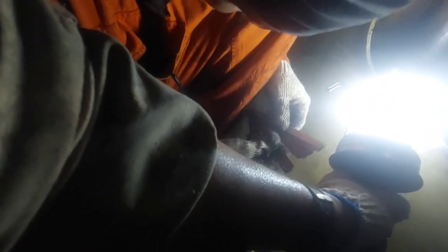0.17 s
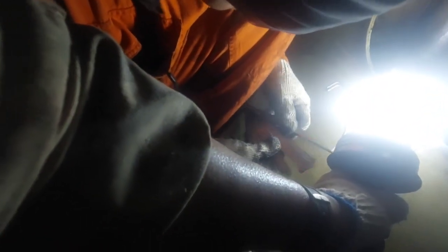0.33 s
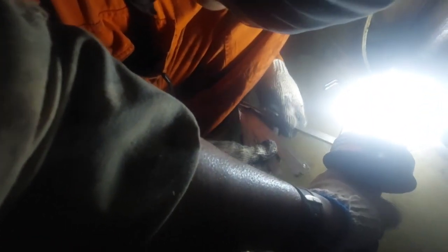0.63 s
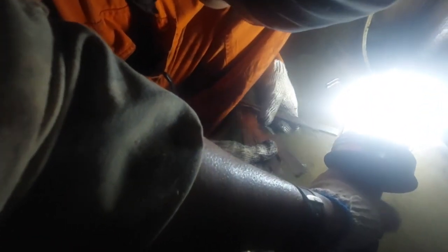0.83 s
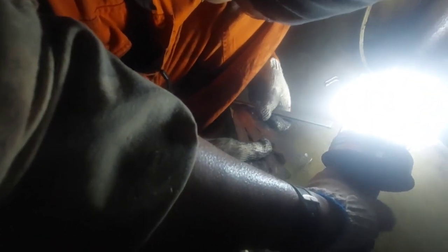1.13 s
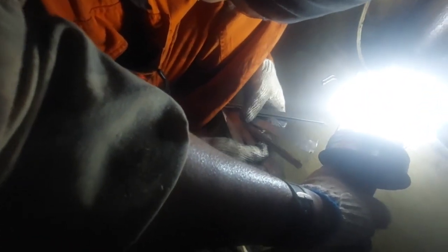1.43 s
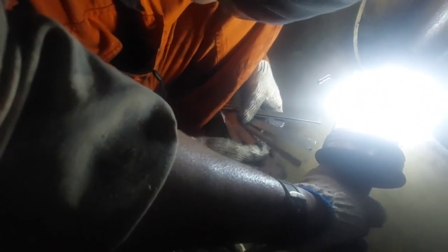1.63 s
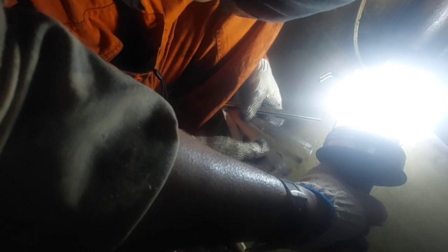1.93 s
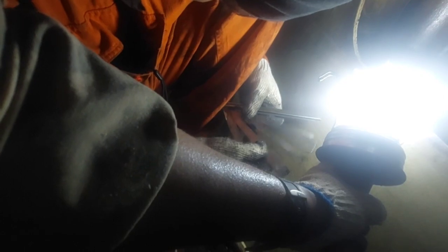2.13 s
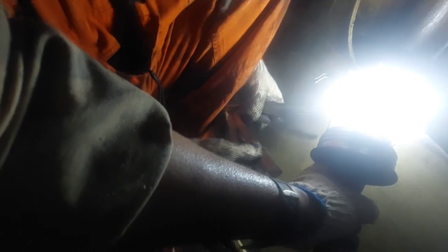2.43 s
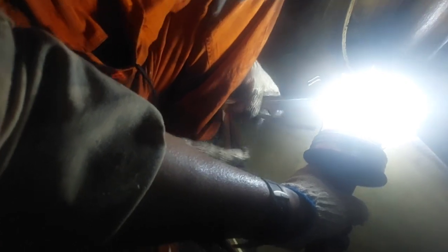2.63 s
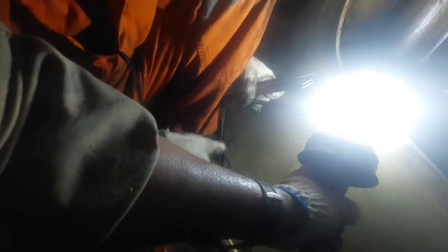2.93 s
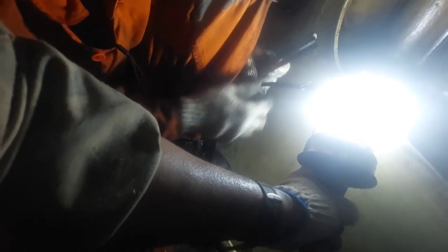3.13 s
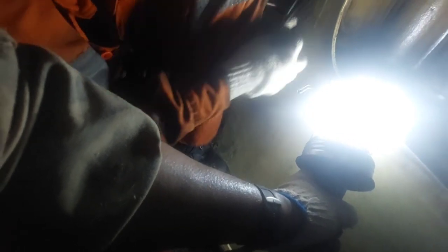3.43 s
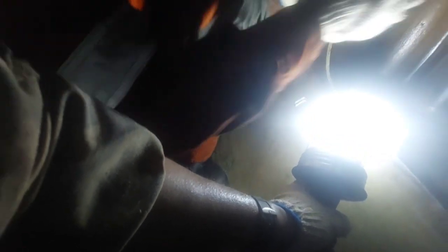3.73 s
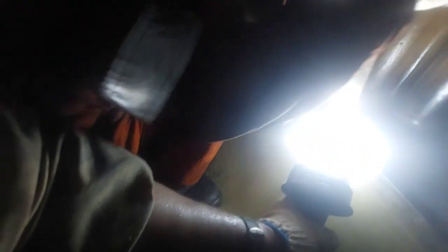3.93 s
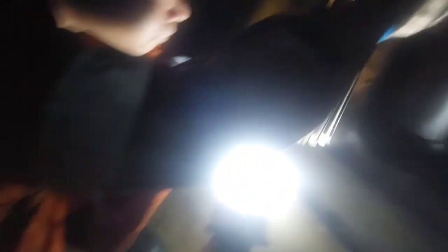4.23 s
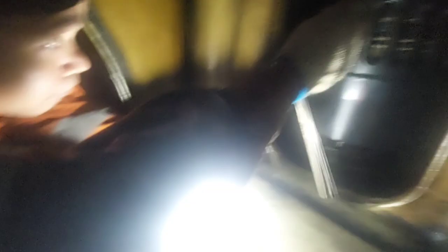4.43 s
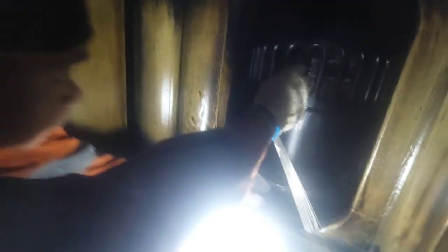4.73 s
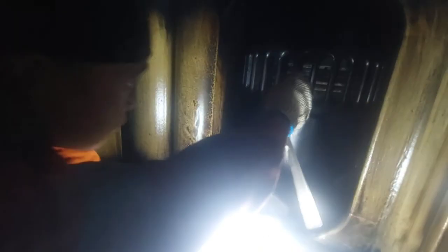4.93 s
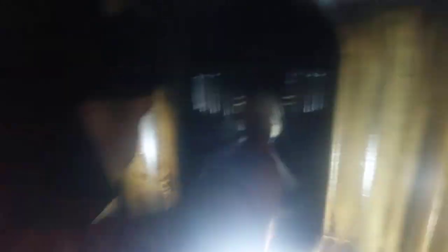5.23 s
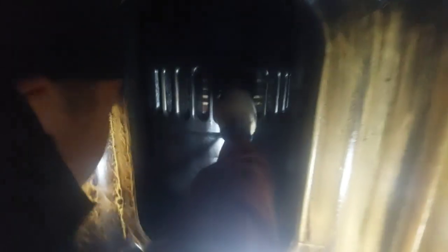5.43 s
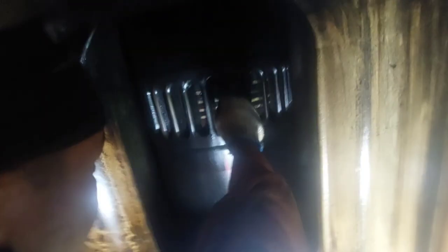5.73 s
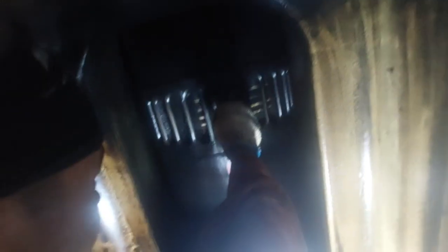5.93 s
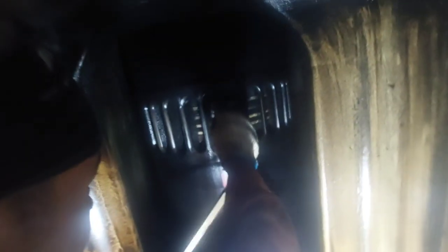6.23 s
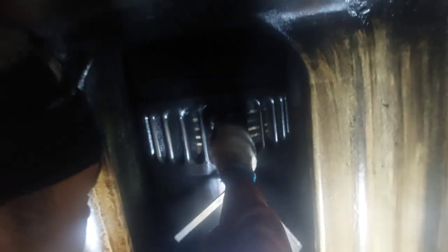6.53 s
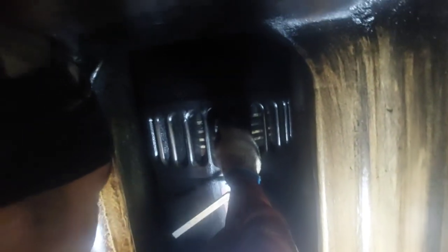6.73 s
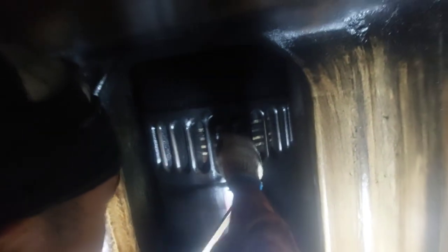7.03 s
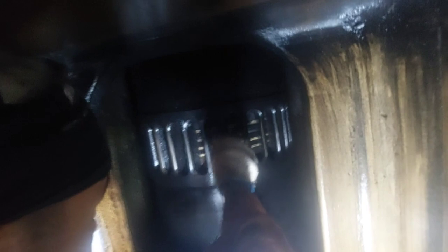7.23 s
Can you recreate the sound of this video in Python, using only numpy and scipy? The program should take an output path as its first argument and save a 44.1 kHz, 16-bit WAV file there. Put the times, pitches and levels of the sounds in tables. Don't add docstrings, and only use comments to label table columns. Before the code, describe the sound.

A heavy engine drone with air roar and pump whine fills a steel space, dipping after a knock on the camera, then a metallic click.

```python
import sys
import numpy as np
from scipy import signal
from scipy.fft import irfft
from scipy.io import wavfile
from scipy.ndimage import uniform_filter1d

SR = 44100
rng = np.random.default_rng(int(sys.argv[2]) if len(sys.argv) > 2 else 0)


def voltage_ratio(level):
    return 10 ** (np.asarray(level, float) / 20)


def generate_wav(signal):
    frames = np.transpose(np.atleast_2d(signal))
    scaled = np.clip(frames, -1, 1) * 32767
    pcm = np.round(scaled).astype(np.int16)
    wavfile.write(sys.argv[1], SR, pcm)


N = 325017

CYCLE = 5884
# t/s, share inside the casing
CASING_PATH = [
    (0, 0.0091),
    (3.9, 0.075),
    (4.5, 0.31),
    (5.0, 0.28),
    (5.5, 0.89),
    (7.37, 1),
]
# multiple of the cycle rate, level/dB outside, level/dB inside
STRONG_ORDERS = [(8, -37, -39), (12, -25, -28), (13, -24, -26), (20, -27, -38), (21, -32, -34),
                 (23, -47, -47), (24, -47, -46), (27, -25, -27), (29, -29, -31), (31, -29, -33),
                 (32, -43, -25), (33, -32, -33), (34, -29, -34), (35, -32, -34), (39, -35, -30),
                 (40, -32, -23), (41, -37, -26), (42, -42, -24), (44, -35, -23), (53, -27, -43),
                 (54, -31, -32), (55, -28, -32), (63, -33, -38), (66, -33, -45), (105, -48, -41),
                 (117, -46, -42), (126, -35, -50), (128, -48, -42), (154, -50, -41), (156, -41, -47)]
# f/Hz, level/dB outside, level/dB inside
WEAK_ORDERS = [(30, -46, -64), (81, -68, -67), (136, -55, -62), (180, -41.5, -49), (252, -31, -28),
               (309, -40, -52), (388, -36.5, -36.5), (480, -40, -37.5), (652, -49, -52.5),
               (710, -44, -59.5), (920, -46, -58.5), (1090, -55, -51), (1430, -58, -91), (2020, -62, -64)]
# order, level/dB outside, level/dB inside
TONES = [(16, -15, -15), (9, -20.5, -39), (30, -21.5, -22), (77.84, -30.5, -41), (6, -32, -33.5),
         (0, -27, -21)]
# beat f/Hz, share of the twin, t/s of a crest
BEATS = [(0.894, 0.11, 1.96), (0.88, 0.28, 1.04), (0.708, 0.22, 2.36), (0.42, 0.21, 3.68),
         (0.58, 0.14, 2.3), (0.607, 0.17, 1.2)]
# order, t/s, level/dB, half-width/s
STANDING_WAVES = [(16, 5.25, -18, 0.39), (16, 1.95, 3.5, .15), (16, 6.8, -6, .12), (16, 7.15, 3.5, 0.087),
                  (9, 0.28, 5.5, 0.14), (9, 0.49, -8, 0.074), (9, 1.87, -8, 0.11), (9, 1.32, 5.5, .35),
                  (9, 2.34, -8, 0.23), (9, 2.9, 6, .15), (9, 3.2, -8, .1), (9, 3.52, 7, .15),
                  (9, 3.83, -10, .15), (9, 7, 8, .3), (9, 4.1, 7, .1), (9, 5, -15, 0.37), (9, 2.1, 5, 0.13),
                  (30, 4.54, 6.5, 0.31), (30, 3.25, 1, 0.13), (78, 4.95, 10, 0.55), (6, 5.1, -9, 0.39),
                  (0, .1, -10, 0.26), (0, 4.93, -9.5, 0.4), (0, 5.35, 5.5, 0.14), (0, 6.4, 2.5, 0.65)]
# f/Hz, level/dB per Hz outside, level/dB per Hz inside
ROAR = [(30, -68, -75), (52, -72, -65), (82.4, -51, -58), (112, -45, -77), (142, -73, -57), (176, -63, -45),
        (217, -40, -41.5), (280, -51.5, -38.5), (394, -46, -49.5), (497, -46.5, -53), (658, -59, -62.5),
        (910, -54.5, -59.5), (1100, -58, -58.5), (1414, -59, -63.5),
        (1620, -69.5, -69.5), (1820, -62.5, -65.5), (2010, -66, -70.5), (2365, -63.5, -63),
        (2716, -68, -70.5), (3570, -75, -77), (4100, -73.5, -77.5), (5420, -78.5, -80.5),
        (5980, -82, -85.5), (8850, -86.5, -88.5), (11500, -84.5, -88), (13800, -86, -90), (15600, -90, -94)]
# f/Hz, width/Hz, level/dB outside, level/dB inside
HULL = [(66.3, 3.2, -31.5, -40.5), (76.2, 5.3, -28, -33), (100, 2.2, -32, -31.5), (153.7, 3.4, -30, -32.5),
        (418.6, 2.5, -37, -41)]
# f/Hz, width/Hz, level/dB outside, level/dB inside
WHINES = [(1676, 4.6, -43.5, -51), (5270, 14, -57.5, -61), (13440, 60, -66, -66)]
PUMP_HZ = 384.5
# multiple, level/dB re the first outside, level/dB re the first inside
PUMP_OVERTONES = [(2, -12, -24), (3, -20, -21), (4, -17, -27), (5, -26, -26)]
# f/Hz, side minus mid level/dB
SIDE_OUTSIDE = [(60, -26), (110, -18.5), (200, -11.5), (380, -7), (700, -2.5), (1290, 3.5), (2380, -1),
                (4400, 0.5), (8120, 0), (15000, 0)]
# f/Hz, side minus mid level/dB
SIDE_INSIDE = [(60, -14), (110, -15), (200, -17.5), (380, -7), (700, 6), (1290, 2), (2380, -1), (4400, 0.5),
               (8120, 0), (15000, 0)]
# f/Hz, share to the left outside, share to the left inside
LEAN = [(60, -0.017, -0.11), (250, -0.13, -0.12), (400, 0.2, -0.28), (700, -0.28, -0.23),
        (1500, -0.43, -0.065), (4400, -0.048, .02), (9000, -.01, .02), (15000, -0.49, -0.22)]
# t/s, level/dB, f/Hz, rise/s, left minus right level/dB
RUSTLES = [
    (2.865, -39, 13000, .015, -2),
    (3.174, -32, 13000, .002, -4),
    (3.306, -37, 12000, .005, -2.5),
    (3.970, -30, 13000, 0.0071, -7),
    (5.085, -43.5, 12600, .04, -14),
    (5.558, -42, 9000, .002, 1),
    (6.04, -43, 13900, .005, -2),
]
# t/s, level/dB, f/Hz, left minus right level/dB
PINGS = [
    (3.972, -32, 15000, -5),
    (7.294, -36, 13500, -7),
]
# t/s, level/dB, f/Hz, t60/s
KNOCK = (4.6424, 5, 280, .017)
# f/Hz, width/Hz, level/dB, t60/s, left minus right level/dB
KNOCK_CRACK = [(11500, 10000, -22, 0.0044, -19), (7000, 8300, -30, 0.017, 3), (1200, 600, -17.5, .025, 5)]
# t/s, level/dB, f/Hz, t60/s, left minus right level/dB
SNAP = (5.2885, -1, 4200, .005, -5)
# f/Hz, width/Hz, level/dB, t60/s, left minus right level/dB
SNAP_CRACK = [(4300, 2200, -24, .035, -10), (11000, 8000, -24.5, .02, -5), (2100, 1200, -18, .012, -5)]
# t/s, cut/dB
GAIN_CUTS = [(0.0, 3), (.5, 2.5), (1.05, 0.5), (1.3, 2), (1.9, 1), (2.43, 2), (3.4, 1), (3.8, 0.5),
             (4.085, 2.5), (4.649, 7), (5.9, 1), (6.25, 2), (7.15, 1.5)]
# t/s, cut/dB, recovery/s
OVERSHOOT = (4.651, 3.9, 0.083)


def evened(x):
    return x / np.sqrt(np.mean(abs(x) ** 2) + 1e-20)


def placed(pair, t):
    share = np.clip(np.interp(t, *np.transpose(CASING_PATH)), 0, 1)[:, None]
    return (1 - share) * pair[0] + share * pair[1]


def read(points, hz):
    f, *columns = np.transpose(points)
    return [np.interp(np.log(hz + 1), np.log(f + 1), column) for column in columns]


def balance(hz, t):
    return 1 + placed(read(LEAN, hz), t).T * [[1], [-1]]


def panned(pan_db):
    return voltage_ratio(np.array([[0.5], [-0.5]]) * pan_db)


def tone_db(t, order):
    i = next(i for i, tone in enumerate(TONES) if round(tone[0]) == order)
    _, *pair = TONES[i]
    beat_hz, share, crest = BEATS[i]
    beat = abs(1 + np.clip(share, 0, 0.9) * np.exp(2j * np.pi * beat_hz * (t - crest)))
    waves = sum(db * np.exp(-((t - s) / half) ** 2)
                for k, s, db, half in STANDING_WAVES if round(k) == order)
    return placed(pair, t)[:, 0] + 20 * np.log10(beat) + waves


def ports(mid, other, hz, t):
    lean = placed(read(LEAN, hz), t)
    width = voltage_ratio(placed(read(SIDE_OUTSIDE, hz) + read(SIDE_INSIDE, hz), t))
    unrelated = np.sqrt(np.maximum(width ** 2 - lean ** 2, 1e-4))
    side = lean * mid + unrelated * other
    return np.array([mid + side, mid - side])


def drift(shape, size):
    z = uniform_filter1d(rng.standard_normal((2, *shape)), size, axis=1)
    return evened(z[0] + 1j * z[1])


def engine(scatter_db=4.0, unsteady_hz=1000, least=0.15):
    cycles, k = N // CYCLE + 3, np.arange(300)
    t, hz = np.arange(cycles) * CYCLE / SR, k * SR / CYCLE

    db = np.array(read(WEAK_ORDERS, hz)) + scatter_db * rng.standard_normal((2, len(k)))
    db -= 60 * ((k < 4) | (k > 280))
    for order, *pair in STRONG_ORDERS:
        db[:, int(order)] = pair
    db = placed(db, t)
    for order, *_ in TONES[:-1]:
        db[:, round(order)] = tone_db(t, round(order))

    loose = np.clip(least + hz / unsteady_hz, 0, 0.9)
    steady = np.exp(2j * np.pi * rng.random((2, 1, len(k))))
    wobble = np.array([drift((cycles, len(k)), size=4) for _ in range(2)])
    mid, other = voltage_ratio(db) * (np.sqrt(1 - loose ** 2) * steady + loose * wobble)

    waves = irfft(ports(mid, other, hz, t), CYCLE) * CYCLE / np.sqrt(2)
    fade = np.sin(np.pi / 2 * np.arange(CYCLE) / CYCLE) ** 2
    joined = waves[:, :-1] * (1 - fade) + waves[:, 1:] * fade
    return joined.reshape(2, -1)[:, :N]


def roar(patchy_db=0.83, flicker_db=-0.14):
    frames, hz = N // 512 + 5, np.fft.rfftfreq(2048, 1 / SR)
    t = np.arange(frames) * 512 / SR
    a, b, c, d, patches = rng.standard_normal((5, frames, len(hz)))

    patches = uniform_filter1d(patches, size=6, axis=0)
    patches = evened(uniform_filter1d(patches, size=20, axis=1))
    flicker = evened(uniform_filter1d(rng.standard_normal(frames), size=3))[:, None]
    flicker = flicker * np.clip(hz / 4000, 0, 1)
    gain = voltage_ratio(placed(read(ROAR, hz), t) + patchy_db * patches + flicker_db * flicker)

    z = ports(a + 1j * b, c + 1j * d, hz, t) * gain * np.sqrt(SR / 2048) * 1.188
    return signal.istft(np.swapaxes(z, 1, 2), nperseg=2048, noverlap=1536)[1][:, :N]


def hull():
    t, out = np.arange(N) / SR, 0
    for hz, width, *pair in HULL + WHINES:
        r = np.exp(-np.pi * width / SR)
        swing = signal.lfilter([1], [1, -2 * r, r * r], drift((N + SR,), size=1))[SR:]
        ringing = (evened(swing) * np.exp(2j * np.pi * hz * t)).real
        out = out + voltage_ratio(placed(pair, t)[:, 0]) * np.sqrt(2) * ringing
    return out * balance(100, t)


def pump(waver_hz=0.6):
    t = np.arange(N) / SR
    speed = PUMP_HZ + waver_hz * drift((N,), size=9000).real
    turn = 2 * np.pi * np.cumsum(speed) / SR
    out = np.sin(turn) * balance(PUMP_HZ, t)
    for k, *pair in PUMP_OVERTONES:
        phase = 2 * np.pi * rng.random((2, 1))
        out += voltage_ratio(placed(pair, t)[:, 0]) * np.sin(round(k) * turn + phase)
    return out * np.sqrt(2) * voltage_ratio(tone_db(t, order=0))


def bursts(events):
    out, t = np.zeros((2, N + SR)), np.arange(SR // 5) / SR
    for s, db, hz, width, rise, t60, pan_db in events:
        edges = np.clip([hz - width / 2, hz + width / 2], 100, SR / 2 - 100)
        sos = signal.butter(2, edges, "band", fs=SR, output="sos")
        band = signal.sosfilt(sos, rng.standard_normal((2, len(t))))
        shape = np.minimum(t / rise, 1) ** 2 * voltage_ratio(db - 60 * np.maximum(t - rise, 0) / t60)
        out[:, round(s * SR):][:, :len(t)] += evened(band) * shape * panned(pan_db)
    return out[:, :N]


def rustles(width_share=0.53, t60=0.053, slowing=3.0):
    return bursts([(s, db, hz, width_share * hz, rise, t60 + slowing * rise, pan_db)
                   for s, db, hz, rise, pan_db in RUSTLES])


def pings(width_hz=450, rise_s=0.003, t60=0.04):
    return bursts([(s, db, hz, width_hz, rise_s, t60, pan_db) for s, db, hz, pan_db in PINGS])


def crack(s, bands, rise_s=0.00082):
    return bursts([(s, db, hz, width, rise_s, t60, pan_db) for hz, width, db, t60, pan_db in bands])


def knock():
    s, db, hz, t60 = KNOCK
    t = np.arange(SR // 5) / SR
    late = np.maximum(t - np.array([[0.0009], [0]]), 0)
    thump = voltage_ratio(db - 60 * late / t60) * (1 - np.exp(-late / 0.0003)) * np.sin(2 * np.pi * hz * late)
    out = crack(s, KNOCK_CRACK)
    out[:, round(s * SR):][:, :len(t)] -= thump
    return out


def snap():
    s, db, hz, t60, pan_db = SNAP
    t = np.maximum(np.arange(N) / SR - s, 0)
    ring = (1 - np.exp(-t / 0.0007)) * voltage_ratio(db - 60 * t / t60) * np.sin(2 * np.pi * hz * t)
    return ring * panned(pan_db) + crack(s, SNAP_CRACK)


def gain_control(rest_db=0.83, recovery_s=0.49):
    t, cut_db = np.arange(N) / SR, 0
    for s, db, recovery in [(s, db, recovery_s) for s, db in GAIN_CUTS] + [OVERSHOOT]:
        cut_db = cut_db + db * np.exp(-np.maximum(t - s, 0) / recovery) * (t >= s)
    return voltage_ratio(rest_db - uniform_filter1d(cut_db, size=200))


def scene():
    machinery = engine() + roar() + hull() + pump()
    handling = rustles() + pings() + knock() + snap()
    return machinery * gain_control() + handling


def band_limit(x):
    return signal.sosfilt(signal.butter(12, 15830, fs=SR, output="sos"), x)


def record(dry, knee=0.62, ceiling=1.02, edge_hz=15520):
    room = ceiling - knee
    over = np.maximum(abs(dry) - knee, 0)
    squeezed = np.sign(dry) * (np.minimum(abs(dry), knee) + room * np.tanh(over / room))
    edge = signal.firwin(801, edge_hz, window=("kaiser", 6), fs=SR)
    limited = signal.oaconvolve(squeezed, edge[None], "same")
    return band_limit(np.clip(limited, -1, 1))


dry = scene()
out = record(dry)
generate_wav(out)
```